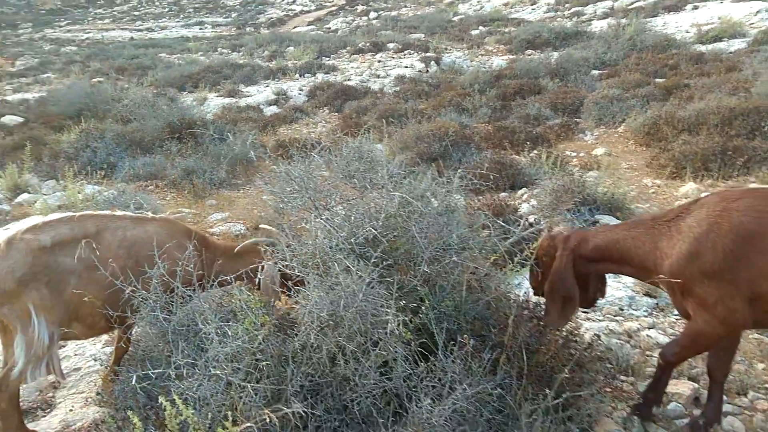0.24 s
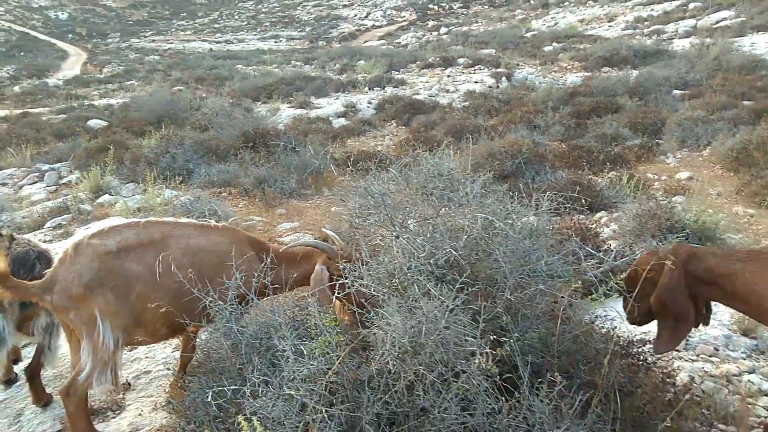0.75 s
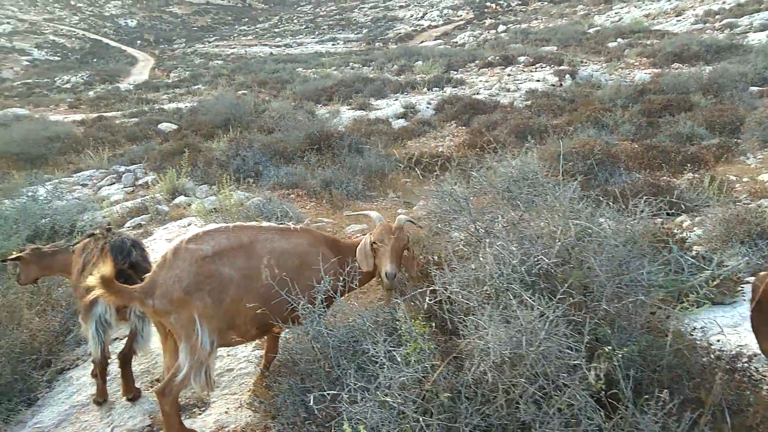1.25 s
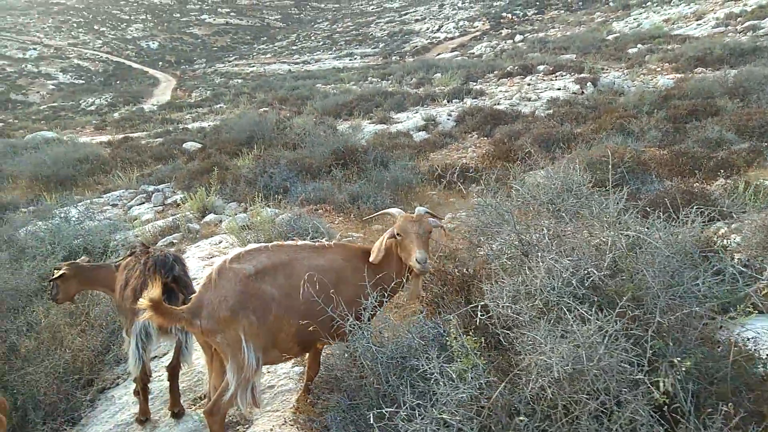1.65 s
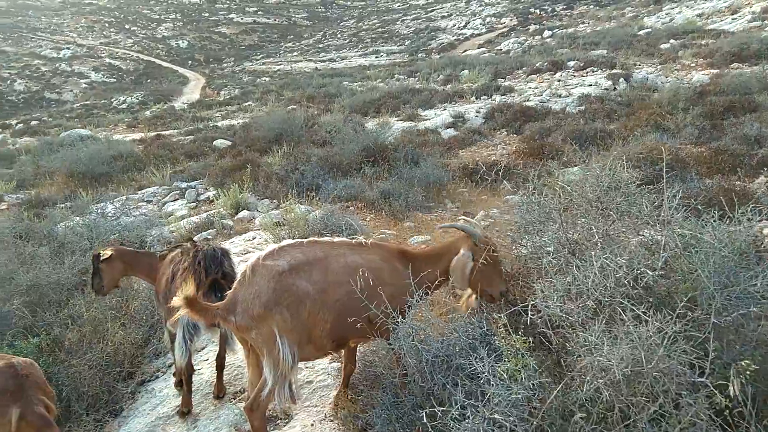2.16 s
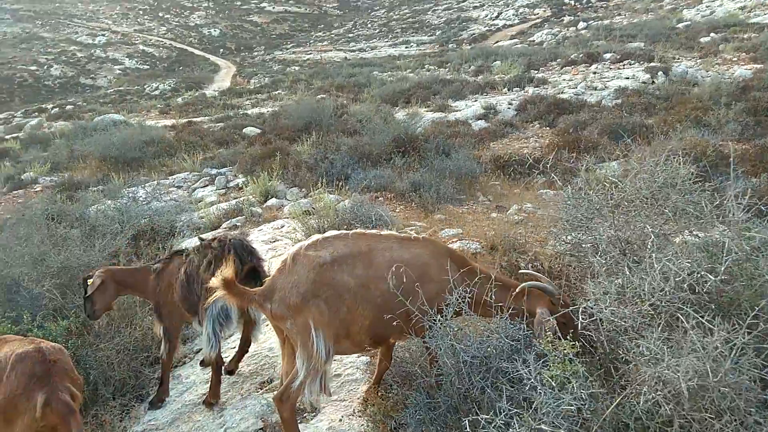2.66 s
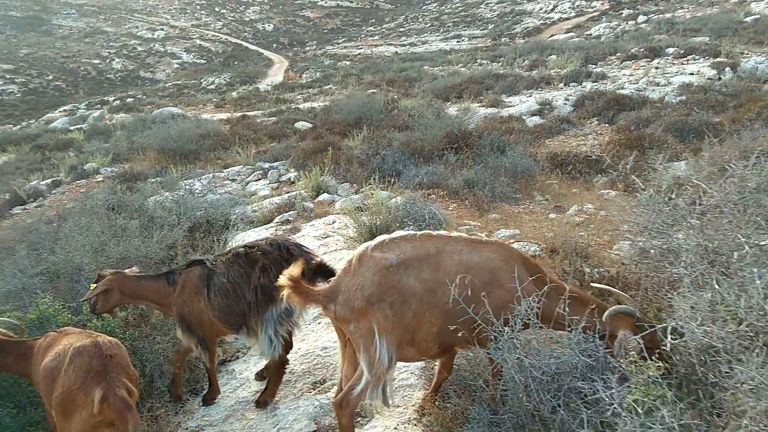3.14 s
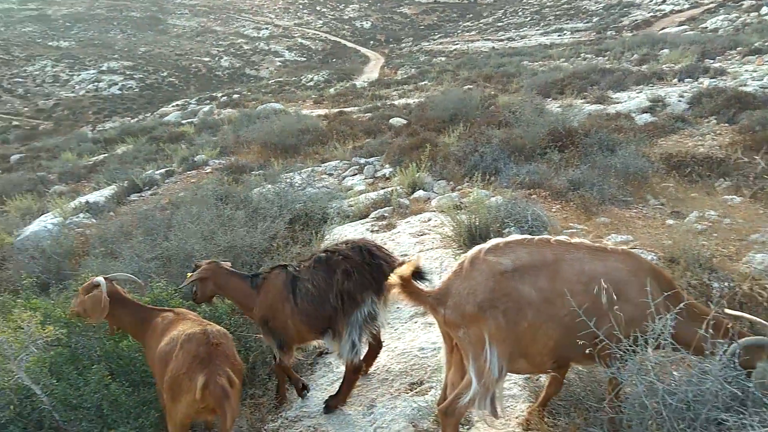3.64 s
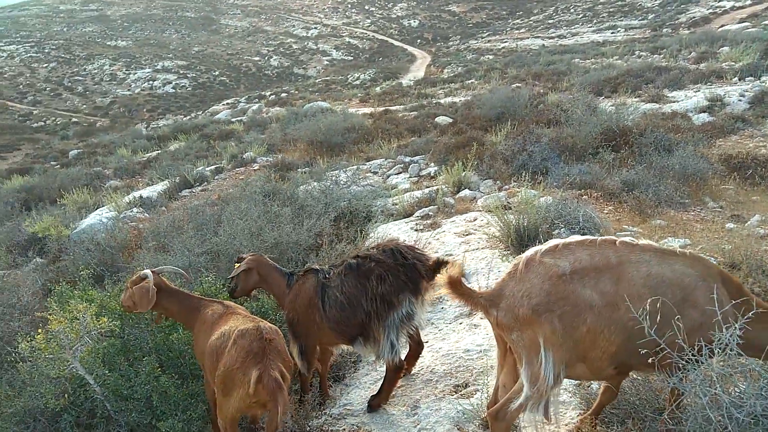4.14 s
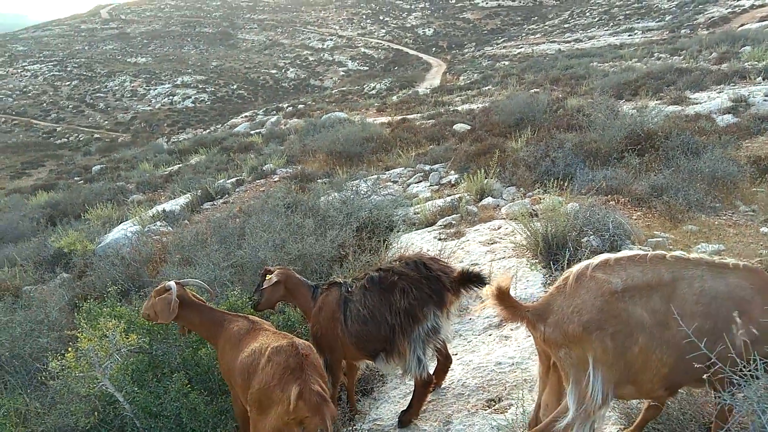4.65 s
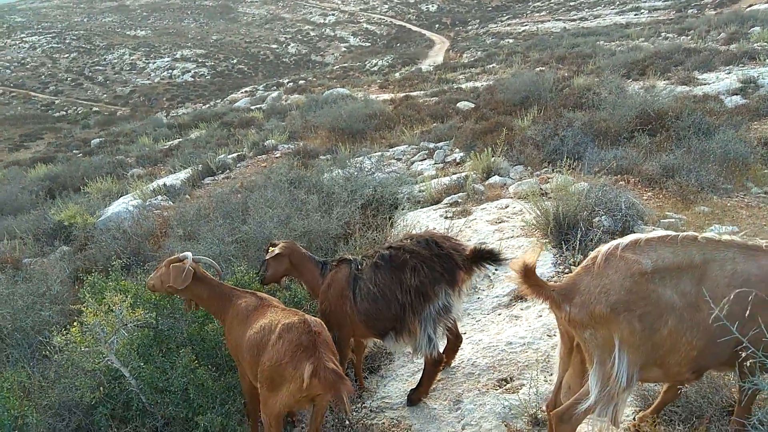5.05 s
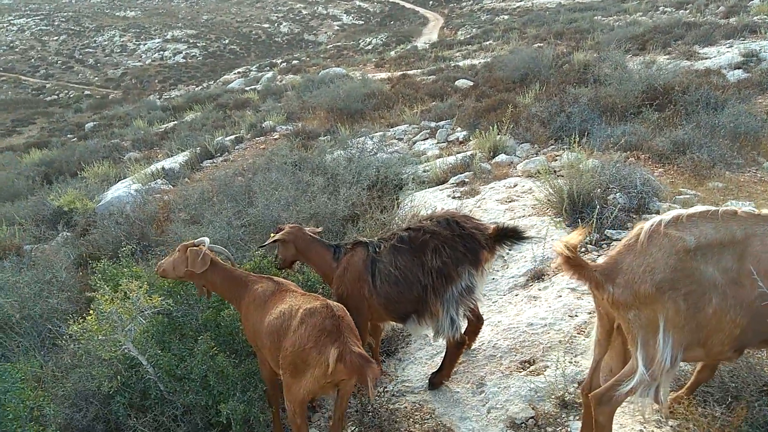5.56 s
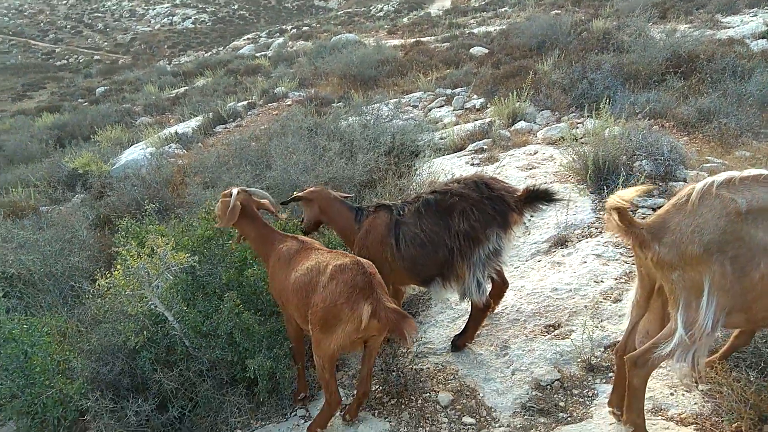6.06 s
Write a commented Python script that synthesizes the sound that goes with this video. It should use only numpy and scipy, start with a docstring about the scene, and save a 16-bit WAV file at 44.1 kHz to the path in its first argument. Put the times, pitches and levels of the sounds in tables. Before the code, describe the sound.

Lumpy low wind buffeting dominates, with crisp little twig cracks and dry leaf rustle as goats browse, then harsh crackling wind overload around five seconds.

```python
"""Goats tug at a dry thorny shrub on an open hillside, a little to the right of a small stereo microphone.
From the start gusty wind buffets the two ports separately: turbulence as shaped noise, slaps as sinking swings.
Soon twigs snap and leaves rustle in bursts (noise decays and ticks), stems break (ringing modes),
and hooves tap loose stones (narrow noise bursts) in the first half.
From about 4 s the right membrane jolts in stepped pulses, most densely just after 5 s; faint hiss lies under all."""
import sys
import numpy as np
from scipy import signal
from scipy.fft import rfft, irfft, next_fast_len
from scipy.io import wavfile
from scipy.ndimage import uniform_filter1d, map_coordinates

SR = 44100
rng = np.random.default_rng(int(sys.argv[2]) if len(sys.argv) > 2 else 0)


def bounce(signal):
    """Save signal as a 16-bit WAV file at the path given by the first command-line argument."""
    frames = np.transpose(np.atleast_2d(signal))
    limited = np.clip(frames, -1, 1)
    pcm = np.round(limited * 32767).astype(np.int16)
    wavfile.write(sys.argv[1], SR, pcm)


def ratio_of_db(decibels):
    """Turn decibels (scalar or array-like) into linear amplitude factors; 0 dB maps to 1."""
    return 10 ** (np.asarray(decibels, float) / 20)


N = 277830
T = np.arange(N) / SR

# Gusts, left port then right port:
# (time at full strength [s], hold [s], buffet level [dB], flutter level against the buffet [dB])
PORT_GUSTS = [
    [(0.0, 0.3, -38.5, -11.5), (0.13, 0.0052, -34, -10), (0.34, 0.48, -48, -7), (0.56, 0.065, -38.5, -7.0),
     (1.1, 0.089, -51, -0.5), (1.365, 0.073, -33, -3), (1.52, 0.051, -28.5, -11),
     (1.59, 0.082, -20.5, -8.5), (1.76, 0.2, -26, -8.5), (2.0, 0.16, -28.0, -4), (2.225, 0.14, -29, -4),
     (2.39, 0.039, -28.5, 4.0), (2.5, 0.086, -44, -6), (2.68, 0.3, -39.5, -1), (3.11, 0.18, -44.5, -16.5),
     (3.68, 0.14, -32, -27), (3.87, 0.38, -28, -16), (4.0, 0.011, -16.5, -20.5), (4.15, 0.055, -22.5, -12),
     (4.34, 0.31, -35, -22), (4.66, 0.14, -23.5, -21), (4.9, 0.053, -24, -24), (5.0, 0.48, -24, -11),
     (5.11, 0.098, -15.5, -9), (5.47, 0.156, -40, -1.5), (5.66, 0.12, -32.5, 1.16), (5.8, 0.47, -38.5, 4)],
    [(0.0, 0.26, -31.5, -30), (0.49, 0.46, -47.5, -25), (1.15, 0.14, -27, -21),
     (1.345, 0.055, -13.5, -26.5), (1.47, 0.34, -23, -22.0), (1.8, 0.093, -17, -26.5),
     (1.89, 0.13, -18.5, -25), (2.07, 0.12, -21.5, -22), (2.22, 0.065, -14, -33), (2.31, 0.096, -16, -23),
     (2.47, 0.1, -39.5, -26.5), (2.65, 0.072, -23, -18.5), (2.75, 0.1994, -38.5, -28.0),
     (3.055, 0.018, -28.5, -11.5), (3.14, 0.51, -45, -20), (3.69, 0.041, -13, -19),
     (3.75, 0.18, -20.5, -17), (3.9, 0.031, -20, -5.5), (3.985, 0.051, -19, -5), (4.08, 0.1, -14, -9.5),
     (4.24, 0.34, -35, -10), (4.39, 0.062, -27.5, -3.5), (4.66, 0.14, -27, -6), (4.85, 0.066, -27, -8),
     (4.92, 0.084, -20, -20.5), (5.07, 0.12, -9.5, -6), (5.225, 0.032, -11, -11.5), (5.3, 0.17, -18.5, -15),
     (5.52, 0.034, -29.5, -21), (5.59, 0.049, -25.5, -8.5), (5.69, 0.032, -21.5, -6),
     (5.82, 0.61, -38.5, -17.5), (6.26, 0.044, -24, -9.5)],
]
# Single eddies, left port then right port; each peaks 8 ms after its time: (time [s], flutter level [dB])
PORT_EDDIES = [
    [(0.126, -24), (0.165, -40), (0.537, -40.5), (0.58, -40.5), (1.383, -32.5), (1.61, -18.5),
     (1.877, -22.5), (2.272, -27), (2.401, -21), (2.494, -36), (3.932, -28), (5.765, -33)],
    [(2.375, -28), (3.053, -23.5), (3.535, -39.5), (4.304, -25), (4.746, -23), (5.384, -18.5),
     (5.775, -22.5)],
]
# Abrupt slaps of air, left port then right port: (time [s], level [dB], nominal opening pitch [Hz])
PORT_SLAPS = [
    [(1.27, -36.5, 330.4), (1.295, -39, 403), (1.359, -42.5, 258.4), (1.518, -27, 78), (1.61, -29, 402.5),
     (1.666, -22, 80), (1.822, -17, 90), (2.236, -18.5, 151)],
    [(0.003, -10, 73.3), (0.184, -20, 89), (1.352, -10, 95.3), (1.553, -9.5, 95), (2.022, -13, 100),
     (2.357, -9, 133.2), (2.472, -30.5, 150), (3.056, -18, 254), (3.895, -13, 147.7), (3.918, -8.5, 230),
     (3.949, -13.5, 284.4), (3.979, -7.5, 246), (4.0, -11, 107.6), (4.087, -25, 151.4), (4.128, -8, 185.3),
     (4.396, -16.5, 258), (4.661, -10.5, 169.4), (4.784, -15.5, 124.8), (4.856, -16, 130.2),
     (5.055, -8.5, 216), (5.066, -5.5, 159.3), (5.218, -4.5, 125.5), (5.6785, -2.5, 107.7)],
]
# The right membrane hits the end of its travel: (time [s], level [dB])
MEMBRANE_JOLTS = [(3.9801, -25.5), (3.9943, -31), (4.1439, -25), (4.1504, -28), (4.1538, -25.5),
                  (5.0584, -33), (5.069, -25), (5.0709, -30), (5.0782, -18.5), (5.086, -41), (5.0888, -14),
                  (5.0925, -27.5), (5.095, -28), (5.0975, -26), (5.103, -25), (5.1134, -32),
                  (5.1177, -21.5), (5.1285, -19), (5.1296, -17.5), (5.141, -27.5), (5.145, -16.5),
                  (5.152, -32), (5.1547, -27), (5.172, -35), (5.1767, -26.5), (5.1925, -31), (5.1977, -31),
                  (5.219, -25), (5.2255, -25), (5.236, -38.5), (5.2431, -31.5), (5.247, -30), (5.251, -43),
                  (5.678, -29.5)]
# Tugs at the shrub: (time at full strength [s], hold [s], rustle level [dB],
# left minus right [dB], thick stems against the leaves [dB])
SHRUB_TUGS = [(0.119, 0.14, -74.5, -15.5, 3), (0.307, 0.014, -51, -29, -23.5),
              (0.408, 0.021, -59.5, -7.5, -19), (0.663, 0.1, -64, -10, -6), (1.691, 0.07, -72, -7, 3.5),
              (1.788, 0.0026, -57.5, -28, -6), (1.947, 0.041, -58, -6.5, -14),
              (2.084, 0.25, -57.5, -4, -14.5), (2.112, 0.031, -51, -4, -5), (2.266, 0.0023, -54.5, 3.5, -6),
              (2.439, 0, -58.5, -0.5, -12.5), (2.631, 0.081, -48.5, -7.5, -25.5),
              (2.825, 0.12, -49, -10.5, -21), (2.972, 0, -45, -5, -15.5), (3.067, 0.031, -53, -13.5, -29.5),
              (3.212, 0, -56, -27, -8.5), (3.272, 0.025, -53, -40, -19), (3.367, 0.005, -51, -9.5, -25.5),
              (3.418, 0, -48.5, -6.5, -7.5), (3.453, 0.0096, -55.5, -13, -38),
              (3.594, 0.16, -60.5, -6, -23), (3.609, 0, -57.5, 0, -43), (4.087, 0.095, -70, -13, 3.5),
              (4.211, 0.022, -55.5, -12.5, -7.5), (4.292, 0.0014, -50, -1, -19),
              (4.489, 0.024, -70.5, 3, -3), (5.502, 0.081, -65, 6, -14), (5.542, 0.25, -50, -2, -17),
              (5.817, 0.076, -66, 0, -6.5), (5.961, 0, -59, -4.5, -13), (6.025, 0.22, -51.5, -1, -15),
              (6.147, 0, -46.5, -10.5, 2)]
# Twig snaps: (time [s], level [dB], left minus right [dB], thickness [0-1])
TWIG_SNAPS = [(0.2206, -37.5, -13, 0.5), (0.3052, -39.5, -38, 0.07), (1.699, -44, -33.5, 1),
              (1.7906, -32, -19.5, 0), (1.943, -33, -11.5, 0.13), (2.0904, -38.5, -9, 0.2),
              (2.115, -35, -8.5, 0.5), (2.2419, -36, -5, 0), (2.2712, -29, -5.5, 0), (2.6387, -22.5, -8, 0),
              (2.703, -34.5, -9.5, 0.14), (2.818, -35.5, -9, 0.3), (2.872, -31.5, -28.5, 0),
              (2.9766, -23, -11.5, 0.9), (3.0698, -33, -4, 0), (3.251, -35, -32, 0.1),
              (3.277, -31, -40, 0.06), (3.373, -35.5, -10.5, 0), (3.4153, -26, -17, 0.14),
              (3.4246, -29, -15, 0.2), (3.437, -36, -11.5, 0), (3.464, -31, -15.5, 0.03),
              (3.468, -37.5, -12.5, 0), (3.611, -31.5, -5.5, 0), (3.724, -37, 3.5, 0),
              (4.089, -41, -0.5, 0.02), (4.216, -40.5, -16, 0.3), (4.2937, -41.5, -4, 0),
              (4.508, -51.5, -12, 0.9), (5.38, -43.5, -11, 0.01), (5.773, -32.5, -2.5, 0.08),
              (6.0216, -34.5, 1, 0), (6.1444, -41, -15.5, 1)]
# Thick stems breaking: (time [s], level [dB], left minus right [dB], main ring [Hz])
STEM_BREAKS = [(0.6636, -38, -8, 3580), (2.1135, -45.5, -3, 1747), (2.9786, -32.5, -5.5, 2250),
               (3.4189, -41.5, -7.5, 1945)]
# Modes of a breaking stem: (pitch against the main ring [ratio], level [dB])
STEM_MODES = [(.4, -3.5), (1, 5.5), (1.5, -7.5), (2.4, -4.5), (4.9, 0.5)]
# Hoof taps on stones: (time [s], level [dB], ring [Hz])
HOOF_TAPS = [(0.378, -59, 880), (0.716, -55, 810), (0.75, -59.5, 916), (1.112, -55, 1100),
             (1.141, -53.5, 930), (1.162, -62, 950), (2.54, -62.5, 1090)]
# Spectrum of the large eddies at middling air speed: (frequency [Hz], level [dB])
BUFFET_SPECTRUM = [(15, -30.5), (30, -30), (45, 6), (65, 1), (100, -2.5), (150, -7.5), (220, -13),
                   (330, -46), (500, -84.5)]
# Spectra of the small eddies at middling air speed, left port then right: (frequency [Hz], level [dB])
FLUTTER_SPECTRA = [
    [(100, -7.5), (220, 1.5), (320, 0), (500, -4.5), (800, -18), (1200, -31.5), (2000, -52), (3000, -100)],
    [(90, -21.5), (160, 4), (240, 8.5), (330, 1), (450, -11), (620, -26.5), (850, -46.5), (1500, -61),
     (3000, -100)],
]
# Spectrum of the leaves: (frequency [Hz], level [dB])
LEAF_SPECTRUM = [(4700, -31.5), (5250, -8.5), (6150, -10.5), (7350, -5), (8900, -2), (11800, 1.5),
                 (14800, -5.5), (15700, -10)]
# Spectrum of the scraping stems: (frequency [Hz], level [dB])
STEM_SPECTRUM = [(700, -4.5), (2200, -4), (5000, -10), (8000, -8)]
# Spectrum of the microphone hiss: (frequency [Hz], level [dB])
HISS_SPECTRUM = [(400, -2), (11000, -6.5), (15400, -16), (16000, -37.5)]

GUST_RISE_DB_PER_S, GUST_FALL_DB_PER_S = 500.5, 380
CALM_BUFFET_DB, CALM_FLUTTER_DB = [-54, -55.5], [-72, -76]  # light air between gusts, left and right
STEADY, STEADY_CYCLES = 0.58, 1.6  # share of chance fading evened out, over how many cycles
SLAP_RISE_S, SLAP_FALL_S, SLAP_SAG_S = .002, 0.0083, 0.044
SHARP_DB, EDGE_S = -8.5, .00002  # reference level and its edge scale, before a chance stretch
TUG_RISE_DB_PER_S, TUG_FALL_DB_PER_S = 1791, 240.5
STIR_DB, STIR_PAN_DB, STIR_STEMS_DB = -77, -7.5, -4.5  # the shrub stirring faintly throughout
STEM_RING_S = 0.0014  # decay at the main ring; higher modes die sooner


def level(x, db):
    """Root-mean-square normalisation: scale to a given rms."""
    return x * ratio_of_db(db) / np.sqrt(np.mean(x ** 2))


def colour(x, points):
    """Spectral shaping by (Hz, dB) points joined over log frequency; rms 1."""
    hz, db = np.transpose(points)
    size = next_fast_len(len(x))
    f = np.maximum(np.arange(size // 2 + 1) * SR / size, 1)
    gain = ratio_of_db(np.interp(np.log(f), np.log(hz), db))
    return level(irfft(rfft(x, size) * gain, size)[:len(x)], 0)


def band(x, lo_hz, hi_hz):
    """Resonant selection by a gentle band-pass."""
    sos = signal.butter(2, [lo_hz, min(hi_hz, .45 * SR)], "band", fs=SR, output="sos")
    return signal.sosfilt(sos, x)


def walk(rate):
    """Slow random modulation: levels held 1 / rate s and smoothed three times; spread near 1."""
    k = int(SR / rate)
    held = np.repeat(rng.standard_normal(N // 50), k)[:N]
    return 1.4 * uniform_filter1d(uniform_filter1d(uniform_filter1d(held, k), k), k // 2)


def swell(s, hold_s, rise_db_per_s, fall_db_per_s):
    """Exponential growth and decay of power: a steady climb in dB, a hold at 1, a steady fall."""
    below_db = rise_db_per_s * np.maximum(s - T, 0) + fall_db_per_s * np.maximum(T - s - hold_s, 0)
    return np.exp(-np.log(10) / 10 * below_db)


def sides(db, pan_db):
    """Power panning: left and right gains for unrelated sounds whose mean has the given level."""
    left = 1 / (1 + ratio_of_db(-pan_db) ** 2)
    return 2 * ratio_of_db(db) * np.sqrt(np.array([left, 1 - left]))


def gusts(rows, calm_buffet_db, calm_flutter_db):
    """Power addition: the gusts at one port add up over the calm, giving buffet and flutter in dB."""
    power = ratio_of_db(np.array([[calm_buffet_db], [calm_flutter_db]])) ** 2
    for s, hold_s, db, flutter_db in rows:
        peak = ratio_of_db(np.array([[db], [db + flutter_db]])) ** 2
        power = power + peak * swell(s, hold_s, GUST_RISE_DB_PER_S, GUST_FALL_DB_PER_S)
    return 10 * np.log10(power)


def drift(points, speed):
    """Frozen turbulence: a fixed pattern of eddies is carried past the port; faster air raises every pitch."""
    pattern = colour(rng.standard_normal(3 * N), points)
    peak_hz = max(points, key=lambda p: p[1])[0]
    # closely following eddies leave few lulls
    swing = uniform_filter1d(pattern ** 2, int(STEADY_CYCLES * SR / peak_hz))
    pattern = level(pattern / (swing + 0.015) ** (STEADY / 2), 0)
    position = np.cumsum(np.clip(speed, .3, 2.8))
    return map_coordinates(pattern, [position], order=3)


def wind():
    """Turbulent pressure: big eddies give a low lumpy buffet, small ones a flutter that climbs with air speed."""
    puffs = [sum(ratio_of_db(db) * np.exp(-((T - s - .008) / 0.00798) ** 2) for s, db in rows)
             for rows in PORT_EDDIES]
    port_levels = map(gusts, PORT_GUSTS, CALM_BUFFET_DB, CALM_FLUTTER_DB)
    out = []
    for (buffet_db, flutter_db), puff, points in zip(port_levels, puffs, FLUTTER_SPECTRA):
        eddies = walk(36)
        buffet = level(ratio_of_db(2.42 * eddies) * drift(BUFFET_SPECTRUM, 2 ** (.3 * walk(20))), 0)
        lumps = level(ratio_of_db(0.95 * eddies + 4.4 * walk(150)), flutter_db) + puff
        speed = np.minimum(100 * ratio_of_db(flutter_db) + 30 * puff, 4) ** .08
        speed = speed * 2 ** (.085 * walk(90) + .045 * eddies)
        out.append(ratio_of_db(buffet_db) * buffet + lumps * drift(points, speed))
    return np.array(out)


def slaps():
    """Damped oscillation: a push sets the port's air swinging; it wobbles, slows and dies in a few cycles."""
    out, t = np.zeros((2, N + 5000)), np.arange(5000) / SR
    envelope = (1 - np.exp(-t / SLAP_RISE_S)) * np.exp(-t / SLAP_FALL_S)
    wobble = np.tile(walk(120), 2)
    for port, rows in enumerate(PORT_SLAPS):
        for s, db, hz in rows:
            at = slice(int(s * SR), int(s * SR) + 5000)
            pitch_hz = hz * 2 ** (.25 * wobble[at]) / (1 + t / SLAP_SAG_S)
            turns = np.cumsum(pitch_hz) / SR
            out[port, at] += 2 * ratio_of_db(db) * envelope * np.sin(2 * np.pi * turns)
    return out[:, :N]


def jolts():
    """Impact at a stop: the membrane steps, chatters, lets go with a smaller step and rattles; mass rounds edges."""
    x, shake, t = np.zeros(N), np.zeros(N), np.arange(1200) / SR
    chances = rng.random((len(MEMBRANE_JOLTS), 2))
    for k, ((s, db), (hold, blunt)) in enumerate(zip(MEMBRANE_JOLTS, chances)):
        # weaker jolts have blunter edges
        width_s = EDGE_S * (1.59 + blunt) * ratio_of_db(0.48 * (SHARP_DB - db))
        edge = (t[:200] / width_s) ** 2 * np.exp(-t[:200] / width_s)
        step = np.convolve(np.exp(-t / 0.00096), edge / edge.sum())[:1200]
        chatter = (rng.random(200) < .06) * rng.standard_normal(200) * np.exp(-t[:200] / .003)
        step = step + 0.7 * np.convolve(step, chatter)[:1200]
        release_s = 0.0014 + 0.0014 * hold
        for late_s, gain in (0, 3.5 * ratio_of_db(db)), (release_s, -ratio_of_db(db + 7)):
            x[int((s + late_s) * SR):][:1200] += (-1) ** k * gain * step  # successive jolts alternate in sign
        shake[int(s * SR):][:1200] += ratio_of_db(db) * np.exp(-t / 0.0059)
    rattle = band(band(rng.standard_normal(N), 410, 730), 470, 1300)
    x += shake * level(rattle, -2)
    mass = signal.butter(3, 5500, fs=SR, output="sos")
    return np.array([np.zeros(N), signal.sosfilt(mass, x)])


def rustle():
    """Many small contacts: uneven leaf ticks over a hiss, bands flickering separately; stems scrape below."""
    power = sides(STIR_DB, STIR_PAN_DB)[:, None] ** 2 * np.ones(N)
    scrape = ratio_of_db(STIR_STEMS_DB) ** 2 * power
    for s, hold_s, db, pan_db, stems_db in SHRUB_TUGS:
        tug = sides(db, pan_db)[:, None] ** 2 * swell(s, hold_s, TUG_RISE_DB_PER_S, TUG_FALL_DB_PER_S)
        power, scrape = power + tug, scrape + ratio_of_db(stems_db) ** 2 * tug
    # each snap shakes the leaves around it for a moment
    for s, db, pan_db, _ in TWIG_SNAPS:
        start = int(s * SR)
        after = T[start:int((s + .25) * SR)] - s
        shaken = sides(db - 32.0, pan_db)[:, None] ** 2 * np.exp(-np.abs(after) / 0.028)
        power[:, start:start + len(after)] += shaken
    leaves = np.array([colour(rng.standard_normal(N), LEAF_SPECTRUM) for _ in range(2)])
    stems = np.array([colour(rng.standard_normal(N), STEM_SPECTRUM) for _ in range(2)])
    stems = ratio_of_db(3.9 * walk(23)) * stems
    shake_db = 2.6 * walk(50)  # shared by all bands
    out = 0
    for lo_hz in 4500 * 1.37 ** np.arange(4):
        ticks = (rng.random(N) < .005) * ratio_of_db(np.minimum(4.5 * rng.exponential(size=N), 13))
        grit = .8 + level(uniform_filter1d(ticks, size=35), -8)
        flicker = ratio_of_db(shake_db + 1.8 * walk(25))
        out = out + flicker * grit * band(leaves, lo_hz / 1.08, 1.48 * lo_hz)
    top = signal.ellip(8, .5, 50, 15700, fs=SR, output="sos")
    return signal.sosfilt(top, out * np.sqrt(power) + stems * np.sqrt(scrape))


def snaps():
    """Brittle fracture: a sharp crack and a splintering tail; thick twigs sound lower."""
    out, t = np.zeros((2, N + 4000)), np.arange(4000) / SR
    shape = np.exp(-t / 0.0015) + ratio_of_db(-7) * np.exp(-t / 0.0071)
    chance = rng.standard_normal((len(TWIG_SNAPS), 2, 4000))
    for (s, db, pan_db, thick), noise in zip(TWIG_SNAPS, chance):
        thick = np.clip(thick, 0, 1)
        ring_hz = 10500 * 0.24 ** thick
        burst = band(shape * noise, 7500 * 0.0061 ** thick, 16000 * 0.29 ** thick)
        burst += 0.43 * band(shape * noise, 0.85 * ring_hz, 1.22 * ring_hz)
        # level set by the first 50 samples
        burst *= 0.31 / np.sqrt(np.mean(burst[:, :50] ** 2, axis=1, keepdims=True))
        out[:, int(s * SR):int(s * SR) + 4000] += sides(db, pan_db)[:, None] * burst
    return out[:, :N]


def breaks():
    """Modal excitation: parting fibres click in a quick run and ring the stem's modes; low modes build up late."""
    out, t = np.zeros((2, N)), np.arange(2000) / SR
    chance = rng.standard_normal((len(STEM_BREAKS), 2, 300))
    for (s, db, pan_db, hz), noise in zip(STEM_BREAKS, chance):
        ring = np.zeros(2000)
        for k, mode_db in STEM_MODES:
            if k * hz < 15000:
                envelope = (1 - np.exp(-t * k * hz)) * np.exp(-t * np.sqrt(k) / STEM_RING_S)
                ring += ratio_of_db(mode_db) * np.sin(2 * np.pi * k * hz * t) * envelope
        fibres = 0.15 * noise * np.exp(-t[:300] / 0.0025)
        fibres[:, 0] = 1  # the first click is the strongest part of the run
        burst = signal.fftconvolve(fibres, ring[None])[:, :2000]
        burst = burst + 3.2 * np.pad(fibres, ((0, 0), (0, 1700)))
        out[:, int(s * SR):int(s * SR) + 2000] += .5 * sides(db, pan_db)[:, None] * burst
    return out


def taps():
    """Struck resonance: small stones ring briefly and unevenly under a hoof, off to the right."""
    out = np.zeros(N)
    for s, db, hz in HOOF_TAPS:
        t = np.clip(T - s, 0, .2) / .004  # in units of the 4 ms rise
        out += level(band(rng.standard_normal(N), 0.89 * hz, 1.23 * hz), db) * t * np.exp(1 - t)
    return out * np.array([[.6], [1.4]])


def hiss():
    """Self-noise: independent shaped random noise in each microphone."""
    return np.array([level(colour(rng.standard_normal(N), HISS_SPECTRUM), -81) for _ in range(2)])


def scene():
    """Linear superposition: wind on the ports over the shrub, the stones and the microphone hiss."""
    return wind() + slaps() + jolts() + rustle() + snaps() + breaks() + taps() + hiss()


def roll_off(x):
    """The treble ends steeply here."""
    return signal.sosfilt(signal.butter(12, 16480, fs=SR, output="sos"), x)


def record(dry):
    """High-pass filtering and soft saturation: a low cut thins the rumble; the preamp rounds the biggest swings."""
    x = signal.sosfilt(signal.butter(3, 46, "high", fs=SR, output="sos"), dry)
    rounded = x / (1 + (x / .95) ** 4) ** .25
    return roll_off(rounded)


dry = scene()
out = record(dry)
bounce(out)
```